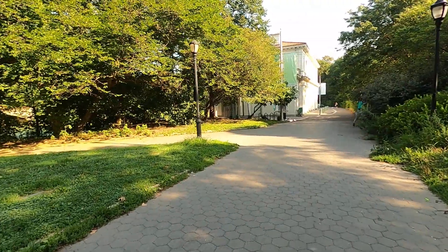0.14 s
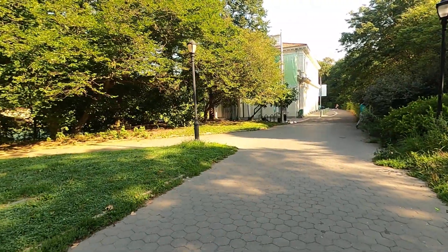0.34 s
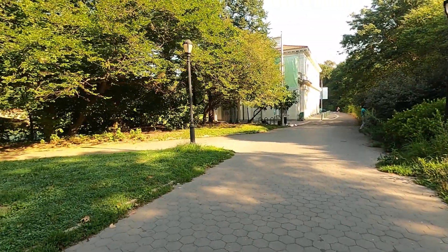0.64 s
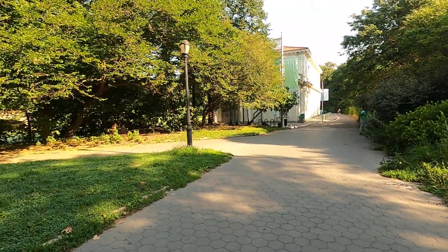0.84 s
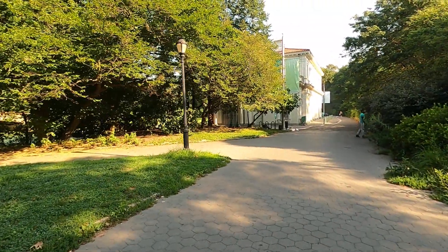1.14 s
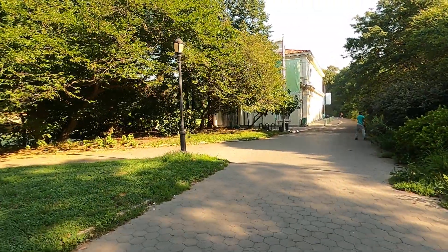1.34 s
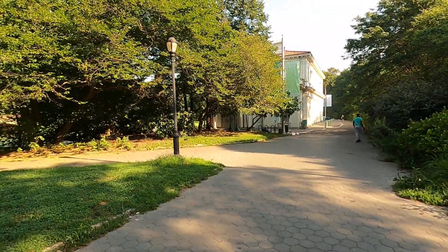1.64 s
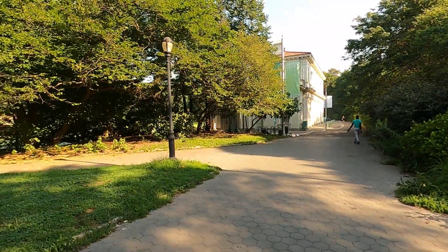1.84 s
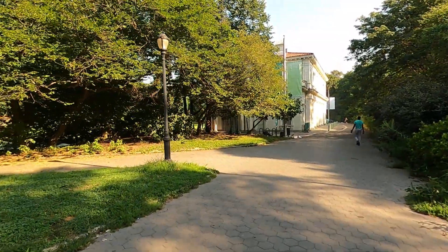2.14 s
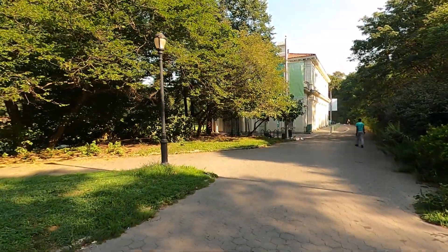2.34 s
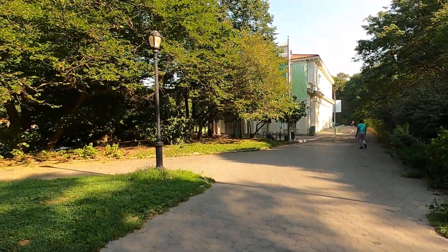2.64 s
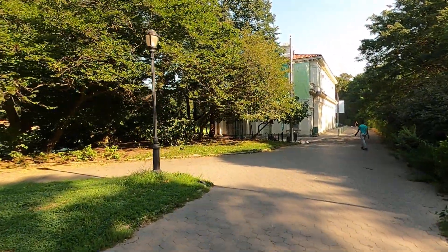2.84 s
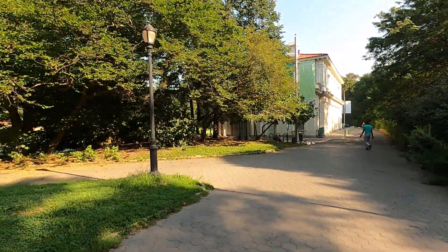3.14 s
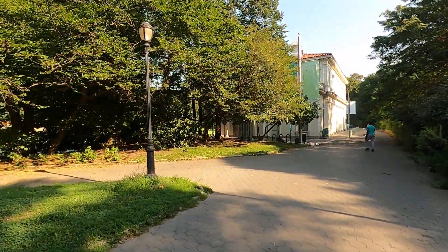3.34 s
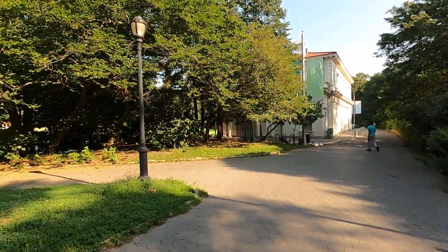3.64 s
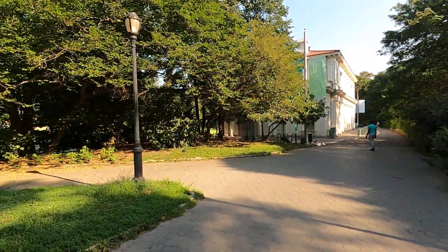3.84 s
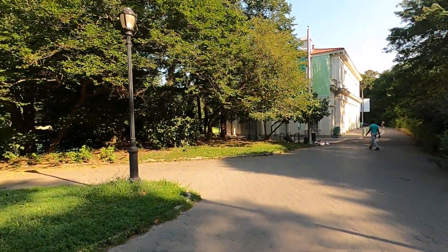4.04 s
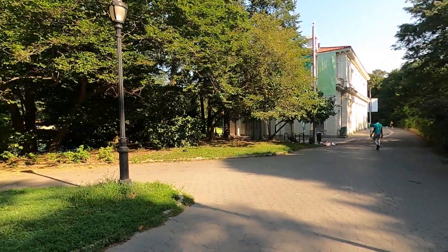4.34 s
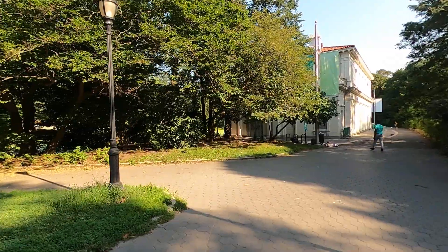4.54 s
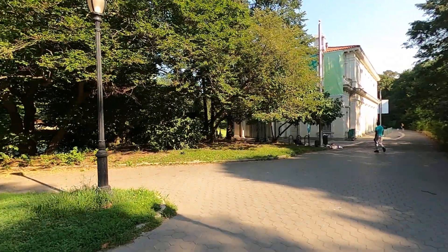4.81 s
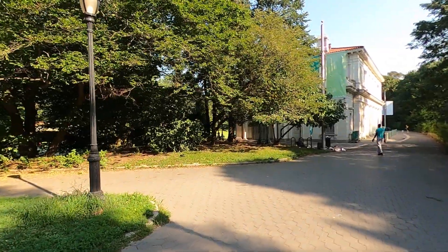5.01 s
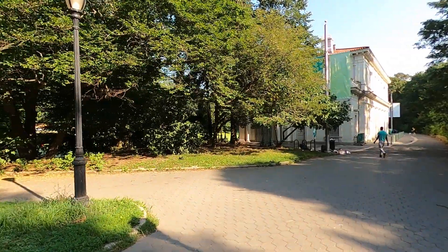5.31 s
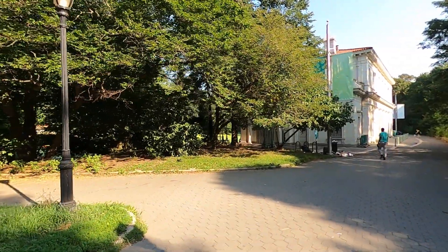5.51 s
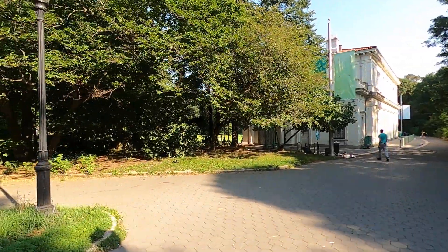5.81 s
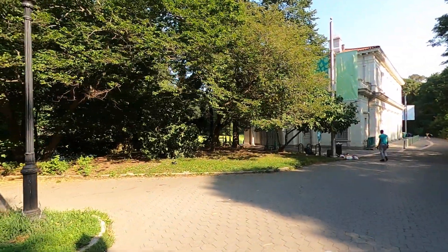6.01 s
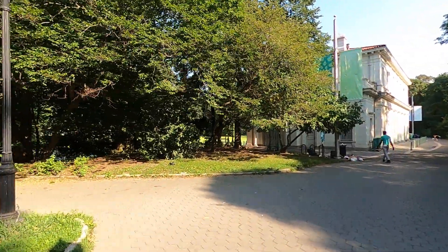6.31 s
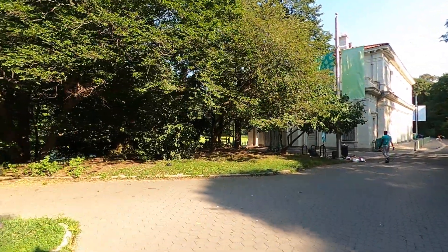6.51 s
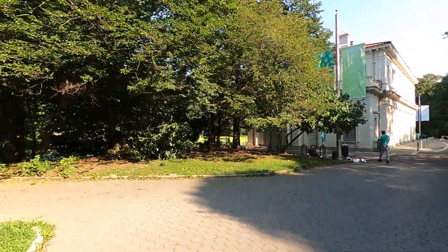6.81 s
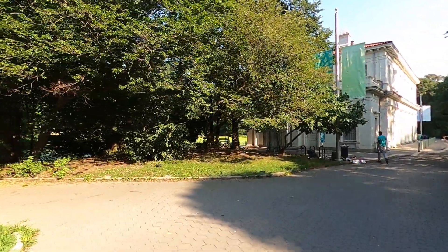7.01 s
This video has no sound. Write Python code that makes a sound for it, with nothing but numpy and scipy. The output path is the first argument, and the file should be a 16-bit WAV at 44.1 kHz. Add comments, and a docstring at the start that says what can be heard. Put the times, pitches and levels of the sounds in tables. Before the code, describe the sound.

Outdoors in a park, a handheld stereo microphone moves at walking pace. Insects trill continuously, high and thin, with pulsing buzzes nearer on the right. Gentle gritty steps and fabric rustles pass beneath, with a sharp handling bump and scrape early on. Sparse sinking bird whistles echo ahead. Later, low gusts thud on the right, and rapid bright cricket chirps stand out over far city rumble.

```python
"""A paved park path on a summer day. Crickets trill in the trees, mostly on the right: a chorus of noise and
pulsed tones, with a few nearer singers as gated tone pips. A far bird whistles by frequency modulation.
A city rumbles as filtered noise with faint swelling tones; soft footsteps and clothes are shaped noise.
Knocks, one of them a hard bump, ring damped modes of the microphone's housing, which scrapes and shudders.
Later gusts buffet mainly the right port as low-frequency noise, and a closer cricket chirps in runs."""
import sys
import numpy as np
from scipy import signal
from scipy.fft import rfft, irfft, next_fast_len
from scipy.io import wavfile
from scipy.ndimage import uniform_filter1d

SR = 44100
rng = np.random.default_rng(int(sys.argv[2]) if len(sys.argv) > 2 else 0)


def file_out(sig):
    """Save sig as 16-bit WAV at sys.argv[1]."""
    # one column per channel
    cols = np.atleast_2d(sig).T
    # limit, then scale
    lim = np.clip(cols, -1, 1)
    pcm = np.round(lim * 32767).astype(np.int16)
    wavfile.write(sys.argv[1], SR, pcm)


N = 315756
TIME = np.arange(N) / SR   # [s]


def from_db(db):
    """Decibel law: 20 dB is a factor of ten in amplitude."""
    return 10 ** (np.asarray(db) / 20)


def rms_one(x):
    """Normalization to unit root-mean-square amplitude."""
    return x / np.sqrt(np.mean(x ** 2) + 1e-20)


def in_time(rows):
    """Linear interpolation: each column of a curve at every sample."""
    s, *columns = np.transpose(rows)
    return np.array([np.interp(TIME, s, c) for c in columns])


def pan(left_db):
    """Level-difference stereo: gains of the two sides for a left-minus-right level."""
    return from_db(np.array([[left_db], [-left_db]]) / 2)


def drift(rate):
    """Random modulation: straight lines join chance values, 2 * rate of them a second; rms 1."""
    knots = rng.standard_normal(int(N / SR * rate * 2) + 3)
    return rms_one(np.interp(TIME * rate * 2, np.arange(len(knots)), knots))


def noise(colour, alike):
    """Spectral shaping and partial coherence: coloured stereo noise, steep beyond its ends; rms 1."""
    size = next_fast_len(N)
    hz, level_db = np.transpose(colour)
    log_hz = np.log(np.maximum(np.fft.rfftfreq(size, 1 / SR), 1))
    beyond = np.abs(log_hz - np.clip(log_hz, np.log(hz[0]), np.log(hz[-1])))
    gain = from_db(np.interp(log_hz, np.log(hz), level_db) - 120 * beyond)
    mid, side = irfft(rfft(rng.standard_normal((2, size))) * gain, size)[:, :N]
    alike = np.clip(alike, 0, 1)
    return rms_one(np.sqrt(1 + alike) * mid + np.sqrt(1 - alike) * side * [[1], [-1]])


def ring(clicks, hz, t60):
    """Damped resonance: a unit click sets a decaying sine ringing."""
    r = from_db(-60 / (t60 * SR))
    w = 2 * np.pi * hz / SR
    return signal.lfilter([0, np.sin(w)], [1, -2 * r * np.cos(w), r * r], clicks + 1e-18)


def trees(x, wet_db, t60):
    """Multiple scattering: trunks and leaves return a dying tail, different on each side."""
    t = TIME[:SR]
    tail = rng.standard_normal((2, SR)) * np.exp(-np.log(1000) * t / t60)
    tail /= np.sqrt(np.sum(tail ** 2, axis=1, keepdims=True))
    return x + from_db(wet_db) * signal.fftconvolve(x[None], tail, axes=1)[:, :N]


def swell(start, attack, hold, fall_db_per_s):
    """Envelope with exponential decay: rises to 1, stays until hold seconds after the start, dies away."""
    age = TIME - start
    return np.clip(age / attack, 0, 1) * from_db(-fall_db_per_s * np.maximum(age - hold, 0))


def puff(centre, half):
    """Gaussian envelope: a short bell-shaped rise and fall."""
    return np.exp(-.5 * ((TIME - centre) / half) ** 2)


def cricket(hz, fall, strokes_per_s, duty, chirps_per_s=0, sung=1):
    """Stridulation: each wing stroke is a tone pip that falls as the file slows; chirps may group them."""
    clock = TIME + rng.random() + .003 * drift(2)
    place = clock * strokes_per_s % 1 / np.clip(duty, .1, 1)
    pip = np.sin(np.pi * np.minimum(place, 1))
    gate = uniform_filter1d(1. * (clock * chirps_per_s % 1 < sung), SR // 200)
    waver = .002 * drift(15)
    pitch = hz * (1 - fall * (np.minimum(place, 1) - .5) + waver)
    return rms_one(pip * gate * np.sin(2 * np.pi * np.cumsum(pitch) / SR))


# chorus, passing to the right as the path goes on; its level is that of the far hiss:
# (time [s], level [dB], left minus right [dB])
CHORUS_COURSE = [(0, -51.5, -3), (2.6, -52.5, -3), (3.4, -50.5, -5.5), (4.4, -52, -8), (5.3, -54, -9.5),
                 (6.0, -52, -8), (7.16, -53, -6)]
# spectrum of the far hiss: (frequency [Hz], relative density [dB])
CHORUS_SPECTRUM = [(3760, -48), (6400, -7), (6860, 3.5), (7370, 3), (7610, 6), (7880, 0), (8120, -9.5),
                   (8280, -14), (8420, -19.5), (8800, -35.5), (11400, -74.5), (19400, -120)]


def chorus(count=7, singers_db=-2.5):
    """Incoherent summation: many far crickets melt into a hiss; closer singers' pips stand out."""
    pitches = np.linspace(7050, 7700, count)
    singers = sum(cricket(hz, .07, rng.uniform(42, 52), .55) for hz in pitches)
    singers = rms_one(trees(singers, wet_db=-3, t60=0.11))
    far = noise(CHORUS_SPECTRUM, alike=0.19) * from_db(0.38 * drift(5.5))
    level_db, left_db = in_time(CHORUS_COURSE)
    sides = from_db([level_db + left_db / 2, level_db - left_db / 2])
    return sides * (far + from_db(singers_db) * singers)


# low buzzer before scattering and panning: (time [s], level [dB])
LOW_BUZZER = [(0, -68), (.9, -63.5), (3, -63), (4.2, -62), (4.8, -66), (5.3, -82), (7.16, -84)]
# second low buzzer: (time [s], level over the first [dB])
SECOND_BUZZER_OVER_LOW = [(0, -14.5), (2, -8), (4.5, -4), (7.16, -2.5)]
# triller in the middle of the chorus, before scattering and panning: (time [s], level [dB])
MIDDLE_TRILLER = [(0, -60), (2.4, -64), (5.0, -55.5), (5.8, -68), (6.5, -60), (7.16, -61)]
# highest triller, before scattering and panning: (time [s], level [dB])
HIGH_TRILLER = [(0, -68), (2.4, -66), (4.8, -72.5), (5.3, -64), (6.0, -59), (6.4, -73), (7.16, -77)]


def near_crickets():
    """Pulse-rate contrast: two fast low buzzers and two slower, higher trillers on the right."""
    low_db, = in_time(LOW_BUZZER)
    second_db, = in_time(SECOND_BUZZER_OVER_LOW)
    middle_db, = in_time(MIDDLE_TRILLER)
    high_db, = in_time(HIGH_TRILLER)
    buzz = cricket(5950, .11, 86, .85, chirps_per_s=12.3, sung=.82)
    second_buzz = from_db(second_db) * cricket(5650, 0.17, 86, 0.8)
    low = trees(from_db(low_db) * (buzz + second_buzz), wet_db=-23.5, t60=0.26)
    middle = trees(from_db(middle_db) * cricket(7320, 0.011, 47, .7), wet_db=-6.0, t60=0.21)
    high = trees(from_db(high_db) * cricket(7950, .022, 46, .6), wet_db=-1, t60=0.34)
    return pan(-8.5) * low + pan(-2) * middle + pan(-5.5) * high


# whistles: (start [s], length [s], reference pitch [Hz], level before its shape and scattering [dB])
WHISTLE_CALLS = [(-.18, 0.29, 3620, -65), (1.42, .26, 3580, -61), (1.969, 0.25, 3575, -62),
                 (3.39, 0.33, 3550, -64.5), (3.986, .27, 3546, -61), (5.372, 0.29, 3550, -62),
                 (5.989, 0.32, 3616, -62.5)]
# shape of a whistle: (share of its length [0-1], pitch over reference [ratio], relative level [dB])
WHISTLE_SHAPE = [(0, .94, -6.5), (0.081, 0.98, -1.5), (.22, 0.98, -3.5), (.42, 0.97, -0.5), (.7, .935, -1),
                 (1, .885, -3)]


def bird():
    """Harmonic series: the fourth harmonic of an arching, sinking whistle outweighs the second and third."""
    share, bend, shape_db = np.transpose(WHISTLE_SHAPE)
    out = np.zeros(N)
    for start, length, hz, level_db in WHISTLE_CALLS:
        place = (TIME - start) / length
        on = (place > 0) & (place < 1)
        pitch = hz * np.interp(place[on], share, bend) * (1 + .006 * drift(90)[on])
        phase = 2 * np.pi * np.cumsum(pitch) / SR   # of the fourth harmonic
        second, third = np.sin(phase / 2), np.sin(phase * 3 / 4)
        voice = np.sin(phase) + from_db(-10) * third + from_db(-7.0) * second
        out[on] += from_db(level_db + np.interp(place[on], share, shape_db)) * voice
    call = trees(out * from_db(2 * drift(40)), wet_db=1.5, t60=1.1)
    centre = call.mean(axis=0)
    return centre + .3 * (call - centre)   # it comes from straight ahead


# spectrum of the low rumble: (frequency [Hz], relative density [dB])
RUMBLE_SPECTRUM = [(12, -43), (20, -10.5), (59, 2.5), (75, -2), (107, -6.5), (140, -8.5), (226, -21.5),
                   (266, -25), (380, -30), (435, -31.5), (505, -31.5), (700, -37.5), (910, -43),
                   (1540, -120)]
# spectrum of the wash of far traffic and leaves: (frequency [Hz], relative density [dB])
WASH_SPECTRUM = [(350, -11.5), (600, -2.5), (725, -30.5), (794, -9.5), (926, -8), (1480, -5), (1870, -11),
                 (3280, -16), (4260, -21.5), (5200, -34), (6760, -42.5), (11400, -120)]
# far brakes and horns: (start [s], length [s], frequency [Hz], level before scattering [dB])
BRAKES_AND_HORNS = [(4.6, 0.4, 1078, -60.5), (4.62, .45, 1400, -70), (4.633, 1.7, 530, -58),
                    (6.3, .9, 581, -61), (6.2, 1, 850, -61.5), (6.1, 1.2, 1163, -61),
                    (6.3, .95, 1500, -64.5), (6.6, .54, 1750, -72)]
RUMBLE_DB, WASH_DB, LEAVES_DB = -32.5, -57, -63.5


def city():
    """Broadband ambience: steady rumble, a wash of far traffic and leaves, faint tonal brakes and horns."""
    tones = np.zeros(N)
    for start, length, hz, level_db in BRAKES_AND_HORNS:
        place = np.clip((TIME - start) / length, 0, 1)
        envelope = np.sqrt(np.abs(np.sin(np.pi * place)))
        pitch = hz * (1 + 0.00298 * drift(5.4))
        tones += from_db(level_db) * envelope * np.sin(2 * np.pi * np.cumsum(pitch) / SR)
    rumble = from_db(RUMBLE_DB) * noise(RUMBLE_SPECTRUM, alike=0.96)
    wash = from_db(WASH_DB + 0.91 * drift(3)) * noise(WASH_SPECTRUM, alike=0.62)
    leaf_spectrum = [(4200, -12.5), (5300, -2.5), (6000, 6.0), (6800, -6), (8300, -12.5), (8800, -23)]
    leaves = from_db(LEAVES_DB) * noise(leaf_spectrum, alike=0.5) * pan(-5)
    return rumble + wash + leaves + trees(tones, wet_db=-7.0, t60=.8)


# gusts on the ports: (start [s], hold counted from the start [s], right level [dB], left minus right [dB])
PORT_GUSTS = [(4.098, .14, -26.5, -10), (4.255, 0.26, -22, -13), (4.788, 0.23, -18, -8.5),
              (5.011, .1, -22, -6.5), (5.628, 0.07, -22, -5), (5.863, 0.1, -24, -4.5),
              (5.994, 0.031, -16.5, -0.5), (6.169, 0.086, -16.5, -6.5), (6.466, 0.3, -19, -5),
              (6.635, .12, -14.5, -6), (6.78, 0.16, -20, -5.5), (7.075, 0.032, -15, -5)]
# strongest eddies at the right port: (centre [s], standard deviation of the bell [s], level [dB])
STRONG_EDDIES = [(4.39, 0.0084, -25), (4.9, 0.016, -15.5), (4.993, 0.0029, -12.5), (5.036, 0.017, -20),
                 (5.655, 0.0093, -26), (6.235, 0.015, -22), (6.54, 0.026, -13), (6.72, 0.024, -15.5),
                 (6.816, 0.0094, -16.5), (7.12, .016, -21)]
# spectrum of the buffeting: (frequency [Hz], relative density [dB])
BUFFET_SPECTRUM = [(15, 0.5), (30, -2.5), (60, 1), (90, 1), (140, -8), (220, -23), (400, -40), (800, -67)]
# spectrum of the eddies: (frequency [Hz], relative density [dB])
EDDY_SPECTRUM = [(50, -13), (110, 3.5), (180, 7.5), (290, -5.5), (450, -14.5), (650, -29.5), (1000, -43),
                 (2000, -46.5)]
GUST_ATTACK_S, GUST_FALL_DB_PER_S = 0.018, 198.5
# the breeze between the gusts, over a constant calm; its left level is relative to the right
BREEZE_FROM_S, BREEZE_RISE_S, BREEZE_DB, BREEZE_LEFT_DB, CALM_DB = 3.75, 0.66, -33.5, -13, -55.5
# small eddies ride on every gust, at a level relative to it
SWIRL_DB, SWIRL_SPREAD_DB, SWIRLS_PER_S = -16.5, 4.5, 18
EDDY_LEFT_DB = -14   # left eddies relative to right


def wind():
    """Turbulent pressure: gusts buffet the ports almost independently; eddies are short, brighter puffs."""
    rise = np.clip((TIME - BREEZE_FROM_S) / BREEZE_RISE_S, 0, 1)
    breeze = from_db([[BREEZE_DB + BREEZE_LEFT_DB], [BREEZE_DB]]) * rise
    gusts = np.zeros((2, N))
    for start, hold, level_db, left_db in PORT_GUSTS:
        sides = from_db([[level_db + left_db], [level_db]])
        gusts = np.maximum(gusts, sides * swell(start, GUST_ATTACK_S, hold, GUST_FALL_DB_PER_S))
    buffet = (from_db(CALM_DB) + np.maximum(breeze, gusts)) * noise(BUFFET_SPECTRUM, alike=0.1)
    swirl = gusts[1] * from_db(SWIRL_DB + SWIRL_SPREAD_DB * np.minimum(drift(SWIRLS_PER_S), 1))
    strong = sum(from_db(level_db) * puff(s, half) for s, half, level_db in STRONG_EDDIES)
    eddies = np.maximum(swirl, strong) * from_db([[EDDY_LEFT_DB], [0]])
    return buffet + eddies * noise(EDDY_SPECTRUM, alike=0.3)


STEP_ATTACK_S = 0.015


def footfall(start, level_db, t60):
    """Contact pressure: a sole's load rises exponentially as it lands and decays as it rolls off."""
    age = np.maximum(TIME - start, 0)
    return from_db(level_db) * (1 - np.exp(-age / STEP_ATTACK_S)) * np.exp(-np.log(1000) * age / t60)


# spectrum of soles on grit: (frequency [Hz], relative density [dB])
STEP_SPECTRUM = [(200, 6.5), (500, 7.5), (750, 1.5), (1200, 8.5), (2000, -11.5), (4000, -22.5),
                 (8000, -26.5)]
# a sole drags: (start [s], level before its onset and decay [dB])
SOLE_SCUFFS = [(1.82, -35), (1.875, -31.5)]
# swishes of clothing: (peak time [s], fall to 1/e [s], peak level before creases [dB])
CLOTH_SWISHES = [(.19, 0.19, -49), (.95, 0.35, -56.5), (1.885, 0.043, -49), (2.115, 0.053, -52.5),
                 (2.255, 0.034, -54.5), (2.4, 0.01, -51), (2.455, 0.031, -52.5), (2.63, 0.11, -55.5),
                 (5.49, 0.027, -54.5)]
# spectrum of the clothing: (frequency [Hz], relative density [dB])
CLOTH_SPECTRUM = [(400, -9.5), (1400, -2.5), (2500, -7), (4500, -16.5), (7000, -18.5), (9500, -36),
                  (13000, -50.5)]
# an even walking pace on soft soles; levels are before each step's onset and decay
FIRST_STEP_S, STEP_EVERY_S, STEP_T60_S, SCUFF_T60_S = .11, .521, 0.36, 0.13
STEP_DB, STEP_SOFTENS_DB_PER_S = -42, 1.05
SWISH_RISE_SHARE = 0.72   # rise over fading time
CREASES_PER_S, CREASE_DB = 51, 5   # tiny snaps of the cloth, relative to the swish


def walker(crease_s=0.0028):
    """Friction noise: soft soles roll onto gritty paving while clothes swish and crease."""
    press = np.zeros(N)
    for s in np.arange(FIRST_STEP_S, N / SR, STEP_EVERY_S):
        press += footfall(s, STEP_DB - STEP_SOFTENS_DB_PER_S * s, STEP_T60_S)
    for s, level_db in SOLE_SCUFFS:
        press += footfall(s, level_db, SCUFF_T60_S)
    steps = press * from_db(2.5 * drift(60)) * noise(STEP_SPECTRUM, alike=1.0)
    swish = np.zeros(N)
    for s, fade, level_db in CLOTH_SWISHES:
        distance = np.maximum(TIME - s, (s - TIME) / SWISH_RISE_SHARE)
        swish += from_db(level_db) * np.exp(-distance / fade)
    snaps = rng.random(N) < CREASES_PER_S / SR
    creases = signal.lfilter([1], [1, -np.exp(-1 / (crease_s * SR))], snaps + 1e-18)
    clothes = swish * (1 + from_db(CREASE_DB) * creases) * noise(CLOTH_SPECTRUM, alike=0.84)
    return steps + clothes


# knocks: (start [s], clack gain [dB], pitch over the housing's own [ratio], thud gain [dB])
HOUSING_KNOCKS = [(0.0834, -36, 0.91, -51), (0.9977, -3, 1.025, -32), (1.005, -16, 0.98, -40),
                  (1.079, -18, 1.1, -28), (1.2292, -17, 1.33, -31), (1.5378, -25, 1.41, -30.5),
                  (6.257, -32, 0.6, -64), (6.2666, -32, 1.1, -64), (6.2721, -23, 0.57, -60),
                  (6.2722, -30, 0.78, -50), (6.281, -35, 1.35, -60)]
# housing modes: (frequency [Hz], relative level [dB], decay by 60 dB [s])
HOUSING_MODES = [(1030, -17, 0.022), (1392, -1, 0.028), (1720, -2, 0.0072), (1943, -10.5, 0.028),
                 (2420, -21.5, 0.026), (2950, -20, 0.025), (3700, -52, .012)]


def knocks():
    """Modal excitation: each blunt knock rings the housing's damped modes and thuds its mount."""
    out = np.zeros(N)
    blunt = signal.butter(2, 3800, fs=SR, output="sos")
    click = signal.sosfilt(blunt, 1. * (np.arange(SR // 2) == 0))
    dull = signal.butter(3, 2700, fs=SR, output="sos")
    thin = signal.butter(2, 750, "high", fs=SR, output="sos")   # a small shell radiates little bass
    for start, level_db, pitch, thud_db in HOUSING_KNOCKS:
        clack = np.zeros(len(click))
        for k, (hz, mode_db, t60) in enumerate(HOUSING_MODES):
            clack += (-1) ** k * from_db(mode_db) * ring(click, hz * pitch, t60)
        # the contact slips a little
        grit = signal.sosfilt(dull, rng.standard_normal(len(click))) * np.exp(-TIME[:len(click)] / 0.0035)
        shell = from_db(level_db) * signal.sosfilt(thin, clack + from_db(-5) * grit)
        sound = shell + from_db(thud_db) * ring(click, 358, 0.13)
        at = int(start * SR)
        out[at:at + len(sound)] += sound[:N - at]
    return out * pan(-4)


# spectrum of the scrape: (frequency [Hz], relative density [dB])
SCRAPE_SPECTRUM = [(300, -15.5), (560, -2.5), (760, -8), (1000, -1), (1400, 1.5), (2000, -6), (3000, -13),
                   (4500, -17.5), (6500, -18), (8000, -31), (10000, -41), (14000, -56)]
# spectrum of the shudder: (frequency [Hz], relative density [dB])
SHUDDER_SPECTRUM = [(20, -8), (45, -3.5), (85, 5), (130, -1), (220, -6), (350, -14.5), (600, -18),
                    (1200, -38)]
# the housing slides in its grip after the bump, then settles
RUB_START_S, RUB_ATTACK_S = 1, 0.014
SCRAPE_DB, SCRAPE_HOLD_S, SCRAPE_FALL_DB_PER_S = -24.5, 0.13, 139
SETTLE_DB, SETTLE_FALL_DB_PER_S = -36, 25.5
SHUDDER_DB, SHUDDER_HOLD_S, SHUDDER_FALL_DB_PER_S = -18, 0.19, 92
JOLT_S, JOLT_HALF_S, JOLT_DB = 1.103, 0.012, -13.5   # the grip catches


def rub():
    """Sliding friction: the bumped housing scrapes and shudders, catches with a jolt and settles."""
    slide = from_db(SCRAPE_DB) * swell(RUB_START_S, RUB_ATTACK_S, SCRAPE_HOLD_S, SCRAPE_FALL_DB_PER_S)
    settle = from_db(SETTLE_DB) * swell(RUB_START_S, SCRAPE_HOLD_S, SCRAPE_HOLD_S, SETTLE_FALL_DB_PER_S)
    roughness = from_db(0.98 * drift(150))
    scrape = (slide + settle) * roughness * noise(SCRAPE_SPECTRUM, alike=0.9) * pan(-1.3)
    shake = from_db(SHUDDER_DB) * swell(RUB_START_S, RUB_ATTACK_S, SHUDDER_HOLD_S, SHUDDER_FALL_DB_PER_S)
    jolt = from_db(JOLT_DB) * puff(JOLT_S, JOLT_HALF_S)
    return scrape + (shake + jolt) * noise(SHUDDER_SPECTRUM, alike=1)


# runs of the nearest cricket: (start [s], length [s], chirp rate [1/s], mean pitch [Hz],
# level reached at the run's end, before scattering and panning [dB])
NEAREST_RUNS = [(5.397, .93, 15.55, 6930, -45), (6.424, .08, 44, 6850, -45.5),
                (6.715, .035, 44, 6680, -48.5), (6.85, .12, 21, 6930, -47)]
CHIRP_SWELL_DB_PER_S, CHIRP_PITCH_SPREAD = 6, 0.011   # spread as a share of the pitch


def chirper():
    """Pulse trains: even runs of chirps grow louder, each a strong falling pip between two weak strokes."""
    out = np.zeros(N)
    t = np.arange(int(.017 * SR)) / SR
    place = t / t[-1]
    for start, length, rate, hz, level_db in NEAREST_RUNS:
        for age in np.arange(0, length, 1 / rate):
            pitch = hz * (1 + CHIRP_PITCH_SPREAD * rng.standard_normal() - 0.025 * (place - .5))
            gain = from_db(level_db - CHIRP_SWELL_DB_PER_S * (length - age))
            pip = gain * np.sin(np.pi * place) * np.sin(2 * np.pi * np.cumsum(pitch) / SR)
            for offset, stroke_db in [(-.022, -17.5), (0, 0), (.021, -26)]:
                at = int((start + age + offset - t[-1] / 2) * SR)
                out[at:at + len(pip)] += from_db(stroke_db) * pip
    return pan(-11.5) * trees(out, wet_db=-9.0, t60=.15)


def ports(x, apart_hz=900):
    """Wavelength against spacing: long waves reach the close ports alike, only short ones differ."""
    mid, side = (x[0] + x[1]) / 2, (x[0] - x[1]) / 2
    short = signal.sosfilt(signal.butter(3, apart_hz, "high", fs=SR, output="sos"), side)
    return mid + short * [[1], [-1]]


# automatic gain: the share of the excess level that it takes away, and its speed
DUCK_ABOVE_DB, DUCK_SHARE, DUCK_DEAF_BELOW_HZ = -29.5, 0.34, 204
DUCK_ATTACK_S, RECOVER_DB_PER_S = 0.11, 4.5


def auto_gain(x):
    """Dynamic range compression: loud sounds turn the gain down quickly; it creeps back up."""
    heard = signal.sosfilt(signal.butter(2, DUCK_DEAF_BELOW_HZ, "high", fs=SR, output="sos"), x)
    power = np.abs(uniform_filter1d(np.mean(heard ** 2, axis=0), SR // 25))
    level_db = 10 * np.log10(power + 1e-12)
    duck_db = DUCK_SHARE * np.maximum(level_db - DUCK_ABOVE_DB, 0)
    recovery_db = RECOVER_DB_PER_S * TIME
    held_db = np.maximum.accumulate(duck_db + recovery_db) - recovery_db
    r = np.exp(-1 / (DUCK_ATTACK_S * SR))
    return x * from_db(-signal.lfilter([1 - r], [1, -r], held_db))


def scene():
    """Superposition: all sources add; insects and wind keep their full stereo difference."""
    insects = chorus() + near_crickets() + chirper()
    return insects + ports(bird() + city() + walker() + knocks() + rub()) + wind()


def record(dry):
    """Compression, saturation and band limiting: gain ducks, peaks are rounded, the top is cut."""
    rounded = 1.178 * np.tanh(auto_gain(dry) / 1.225)
    top_cut = signal.cheby2(12, 70, 15500, fs=SR, output="sos")   # stopband from 15500 Hz, 70 dB down
    return signal.sosfilt(top_cut, rounded)


dry = scene()
out = record(dry)
file_out(out)
```